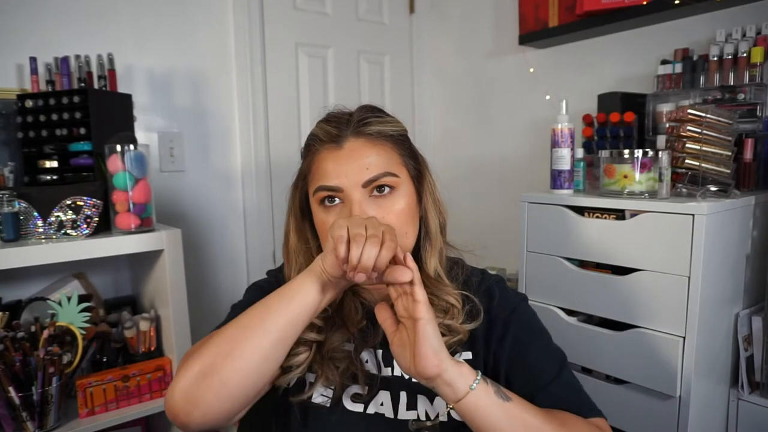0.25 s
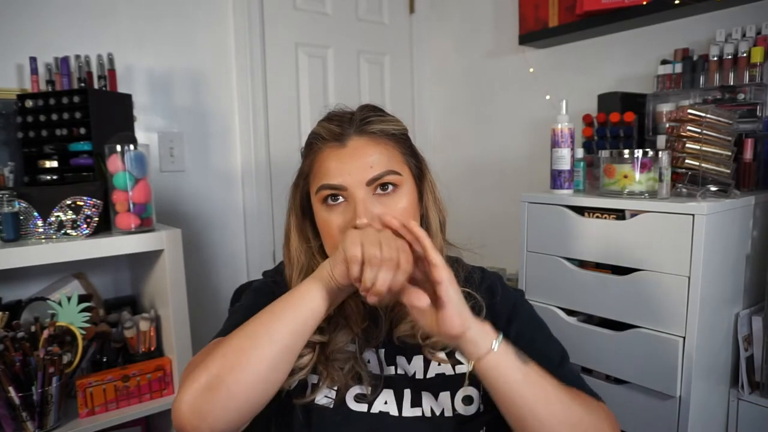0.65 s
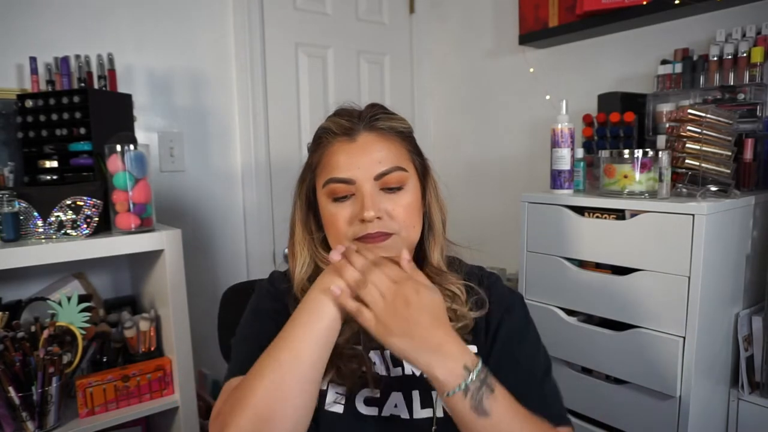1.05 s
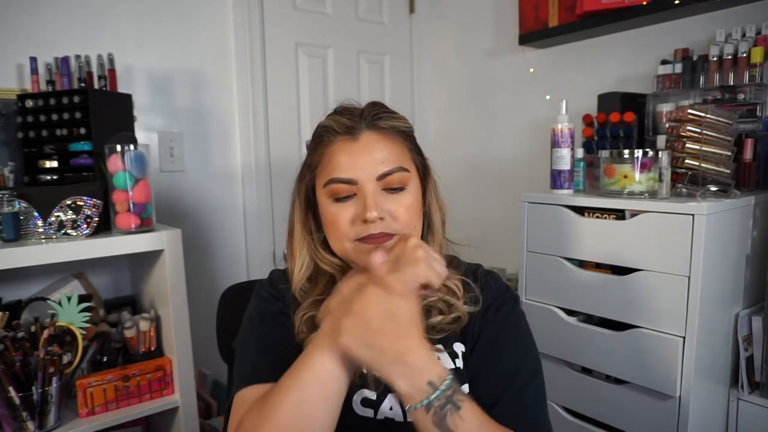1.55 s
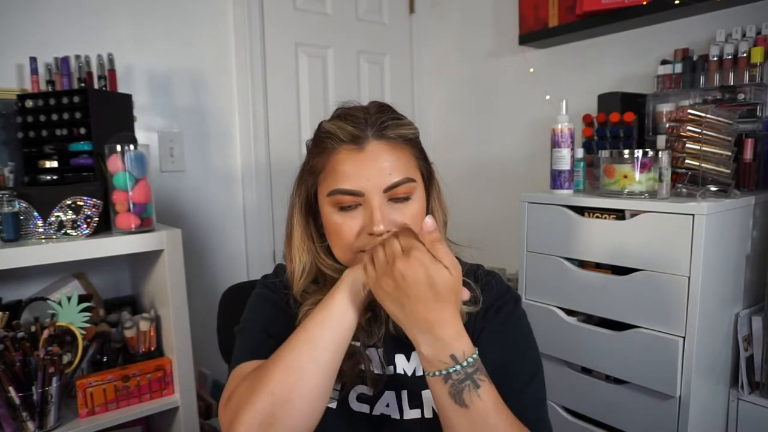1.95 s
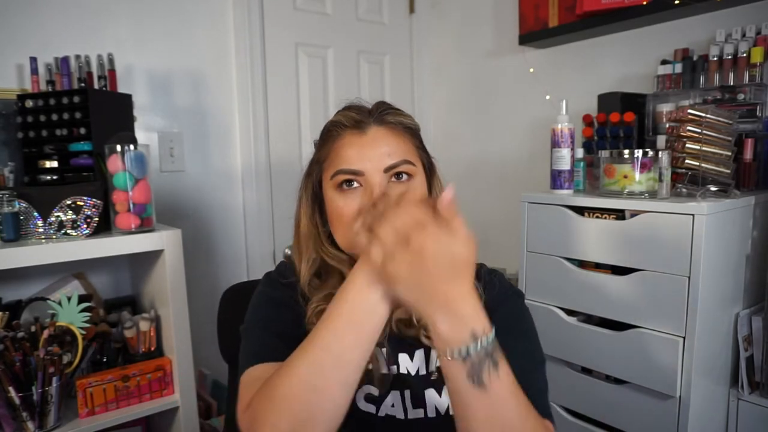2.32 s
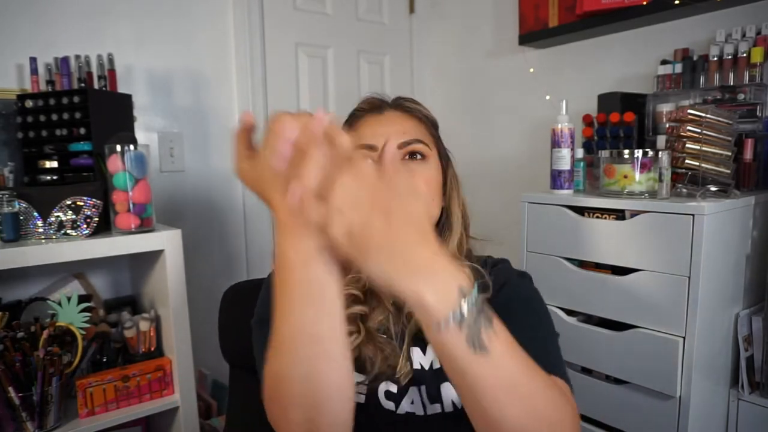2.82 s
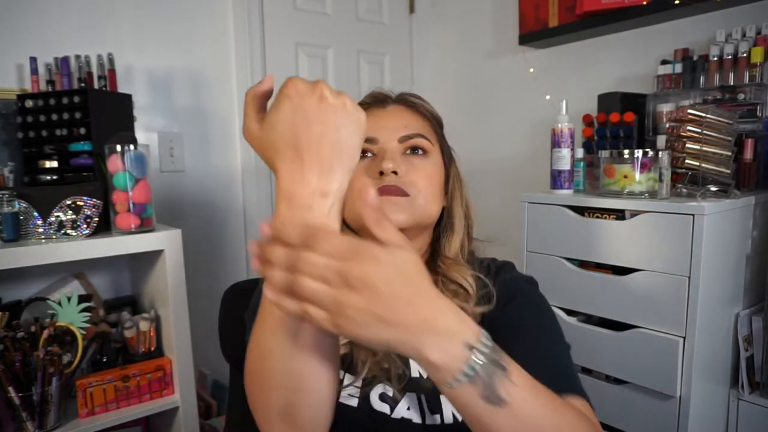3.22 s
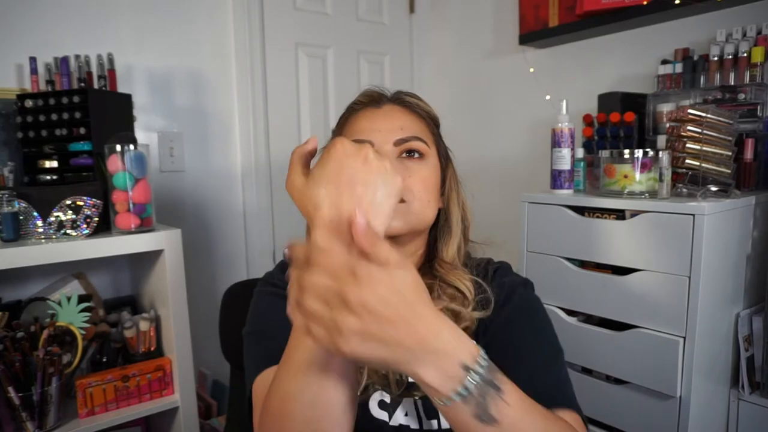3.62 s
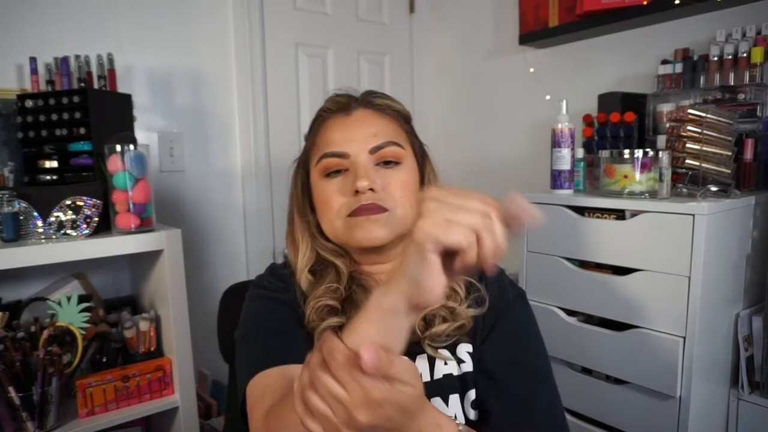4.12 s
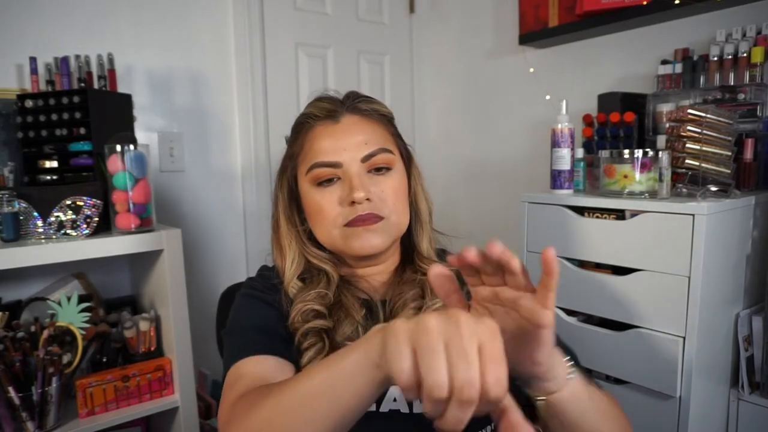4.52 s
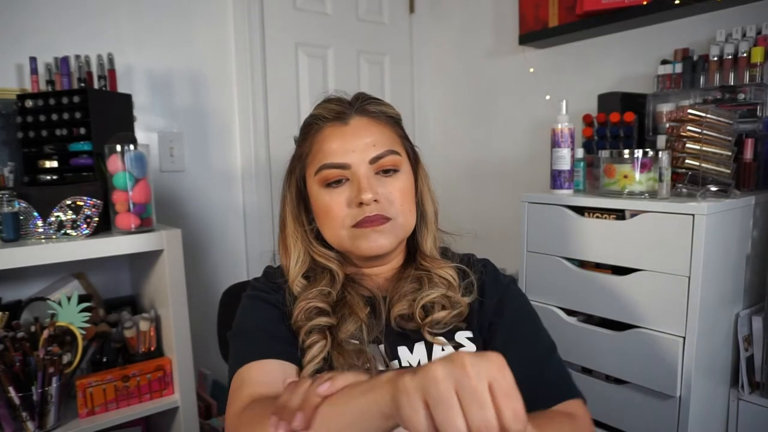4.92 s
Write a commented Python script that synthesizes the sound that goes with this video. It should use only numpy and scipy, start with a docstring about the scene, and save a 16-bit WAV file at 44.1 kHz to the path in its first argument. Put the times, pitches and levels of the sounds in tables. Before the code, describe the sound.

Soft hissing strokes of skin sliding on oiled skin grow brisker, with one small wet tick, over a low appliance hum.

```python
"""Oiled hands rub over each other and along a forearm in soft swishes, close before a stereo pair.
Countless tiny slips of skin make the hiss; a flat palm deepens it, and pockets of air between the
hands ring faintly. A wet tick sounds as a hand lands on the arm, and sleeves rustle. The place is a
small room: the desk reflects the strokes, and an electric appliance hums behind in the room tone."""
import sys
import numpy as np
from scipy import signal
from scipy.fft import rfft, irfft
from scipy.io import wavfile

SR = 44100
rng = np.random.default_rng(int(sys.argv[2]) if len(sys.argv) > 2 else 0)


def wav_record(signal):
    """Record a signal, one row per channel, as 16-bit PCM in the file named by sys.argv[1]."""
    frames = np.transpose(np.atleast_2d(signal))
    bounded = np.clip(frames, -1, 1)
    # unit amplitude maps onto the largest positive 16-bit level
    quanta = np.round(bounded * 32767).astype(np.int16)
    wavfile.write(sys.argv[1], SR, quanta)


N = 227586
TIME = np.arange(N) / SR
BANDS_HZ = 25 * 2 ** (np.arange(29) / 3)


def from_db(db):
    """Decibels to gain."""
    return 10 ** (np.asarray(db) / 20)


def unit_rms(x):
    """Scale to unit power."""
    return x / np.sqrt(np.mean(x ** 2) + 1e-20)


def in_time(points):
    """Read a curve sample by sample."""
    return np.interp(TIME, *np.transpose(points))


def at_hz(points, hz):
    """Read a spectrum on a log-frequency axis."""
    frequencies, values = np.transpose(points)
    return np.interp(np.log(hz), np.log(frequencies), values)


def drift(rate_hz):
    """Slow random wander with a spread of about 1."""
    step, settle = 40, 2000
    pole = np.exp(-2 * np.pi * rate_hz * step / SR)
    white = rng.standard_normal(N // step + settle + 2)
    slow = signal.lfilter([1], [1, -2 * pole, pole * pole], white)[settle:]
    return np.interp(np.arange(N) / step, np.arange(len(slow)), unit_rms(slow))


def filtered(x, hz, kind, order=2):
    """Low-, high- or band-pass."""
    return signal.sosfilt(signal.butter(order, hz, kind, fs=SR, output="sos"), x)


def third_octave(x, hz):
    """One band around hz."""
    return filtered(x, [hz / 2 ** (1 / 6), hz * 2 ** (1 / 6)], "band")


# Slides of skin over skin: (time [s], length [s], relative level [dB], fastest moment [share of length],
# peakedness [1 even push, 4 brief flick], palm contact [dB], its growth [dB], low edge of the hiss [Hz])
HAND_STROKES = [(-0.098, 0.47, -46.5, 0.2, 2.56, -5.4, -18, 5780),
                (0.5, 0.44, -52, 0.58, 1.5, -8, -1.1, 5340), (0.684, 0.38, -43.5, 0.41, 2.9, -4, -12, 3520),
                (0.899, 0.46, -52, 0.088, 2.1, -1.5, -4, 2900),
                (1.05, 0.53, -45.5, 0.68, 2.55, -4, 8, 2870), (1.059, 0.18, -49, 0.79, 2.6, 0.5, -5, 5400),
                (1.253, 0.084, -47.5, 0.4, 1.5, -4, 5, 4000), (1.507, 0.29, -39.5, 0.41, 1.84, -2, 4, 2200),
                (1.715, 0.34, -45, 0.76, 2.5, -8, 10, 3800), (2.01, 0.29, -40.5, 0.51, 2.06, -2, -5, 4760),
                (2.246, 0.098, -37.5, 0.99, 3, -9.5, -3, 4260),
                (2.28, 0.19, -40.5, 0.5, 1.6, -3.5, -11, 2550),
                (2.346, 0.35, -38, 0.68, 2.45, -5.6, -8, 2340),
                (2.57, 0.21, -31.5, 0.73, 2.35, -13.5, 11, 2800),
                (2.746, 0.093, -35, 0.18, 4.7, 0, 16, 4540),
                (2.795, 0.24, -33, 0.53, 1.73, -10.5, -2.2, 2890),
                (2.988, 0.24, -33.5, 0.31, 3.7, -6, 24, 2500), (3.09, 0.33, -34.5, 0.52, 2.8, -6, -7, 2120),
                (3.309, 0.23, -33.5, 0.64, 2, -9.5, 19, 2430),
                (3.489, 0.29, -36, 0.44, 1.7, -5.5, 2.0, 2100),
                (3.727, 0.17, -36, 0.51, 1.74, -7, 16, 2420),
                (3.882, 0.14, -37.5, 0.68, 0.79, -3, -2, 2720), (3.94, 0.2, -31, 0.51, 2.55, -2, 6, 3900),
                (4.115, 0.32, -38, 0.52, 2.16, -3, 1, 3550), (4.298, 0.28, -49, 0.25, 2.7, -0.5, 11, 3140),
                (4.652, 0.34, -38.5, 0.48, 3.45, 0.3, 21, 3780), (4.869, 0.57, -41, 0.22, 2, 0.7, -7, 3440)]

def strokes(slow_dull_db=1):
    """Each stroke speeds up and slows, duller when slow; where two overlap, the louder sets the colour."""
    total, colour = 0, 0
    for start, length, level_db, fastest, peakedness, palm_db, growth_db, edge_hz in HAND_STROKES:
        progress = np.clip((TIME - start) / length, 0, 1)
        speed = np.sin(np.pi * np.interp(progress, [0, np.clip(fastest, .05, .95), 1], [0, .5, 1]))
        power = (from_db(level_db) * speed ** peakedness) ** 2 + 1e-14
        contact_db = palm_db + growth_db * (progress - .5) + slow_dull_db * (1 - speed)
        total += power
        colour += power * np.array([contact_db, np.full(N, edge_hz)])
    contact_db, edge_hz = colour / total
    return 10 * np.log10(total), contact_db, edge_hz


def skin_slips(per_s=8000, spread_db=2.5, smooth_hiss=0.9):
    """Tiny releases of oily skin, uneven in size, over a smooth sliding hiss."""
    sizes = from_db(spread_db * np.minimum(rng.exponential(1, N), 4)) * rng.choice([-1, 1], N)
    releases = sizes * (rng.random(N) < per_s / SR)
    return unit_rms(unit_rms(releases) + smooth_hiss * rng.standard_normal(N))


# Sliding skin, heard close: (frequency [Hz], relative density [dB])
SKIN_SPECTRUM = [(500, -15), (1000, -9.5), (1600, -9), (2200, -5.5), (3000, -2), (4500, -0.56),
                 (6500, -0.43), (9000, -0.5), (12500, 1.5), (15500, 0.5)]
# How far each band follows the palm contact: (frequency [Hz], share [0-1])
PALM_WEIGHT = [(500, 0), (2000, 0.88), (4000, 1.0), (6000, 0.84), (8500, 0), (12000, 0)]
# A hard rub bites more: (frequency [Hz], boost [dB per dB of stroke level])
RUB_BITE = [(4000, 0.116), (7500, 0.22), (10000, 0.09), (14000, 0)]

def rubbing(trim_db=1, judder_db=0.43, patchy_db=1.72, usual_swish_db=-40, late_share=0.18, room_db=0.5):
    """Sliding speed sets the level, contact area the depth, the gap between the hands the low edge."""
    swish_db, palm_db, edge_hz = strokes()
    slips = [skin_slips(), skin_slips()]
    scatter = rng.standard_normal((3, 2, N))
    level_db = trim_db + swish_db + judder_db * drift(19)
    direct, diffuse, treble_power = 0, 0, 0
    for k, hz in enumerate(BANDS_HZ[BANDS_HZ > 450]):
        skin = from_db(at_hz(SKIN_SPECTRUM, hz))
        band = skin * third_octave(slips[k % 2], hz)
        treble_power += np.mean(band ** 2) * (hz > 7000)
        thin_db = 8.5 * np.maximum(np.log2(edge_hz / hz), 0)   # by octaves below the edge
        depth_db = at_hz(PALM_WEIGHT, hz) * palm_db
        bite_db = at_hz(RUB_BITE, hz) * (swish_db - usual_swish_db)
        gain = from_db(level_db + depth_db + bite_db - thin_db + patchy_db * drift(18.7))
        direct += gain * band
        # the hands keep moving, so their reflections blur into a wash that differs at each microphone
        wash = np.sqrt((1 - late_share) * gain ** 2 + late_share * room_decay(gain ** 2))
        diffuse += wash * skin * third_octave(scatter[k % 3], hz)
    return direct / np.sqrt(treble_power), from_db(room_db) * diffuse / np.sqrt(treble_power)


def room_decay(power, t60_s=0.42):
    """Power lingers between the walls of the small room, dying away."""
    pole = from_db(-120 / (t60_s * SR))
    return signal.lfilter([1 - pole], [1, -pole], power + 1e-18)


def microphone_pair(direct, right_lag_samples=0.52, desk_db=-10, desk_decay_s=0.0037):
    """The hands are a hair nearer the left microphone; quick reflections come off the desk."""
    hz = np.arange(N // 2 + 1) * SR / N
    right = irfft(rfft(direct) * np.exp(-2j * np.pi * hz * right_lag_samples / SR), N)
    age = np.arange(SR // 50) / SR
    desk = rng.standard_normal((2, len(age))) * np.exp(-age / desk_decay_s)
    desk *= from_db(desk_db) / np.linalg.norm(desk, axis=1, keepdims=True)
    return np.array([direct, right]) + signal.fftconvolve(direct[None], desk, axes=1)[:, :N]


# Sleeves shifting, at the microphones: (time [s], level [dB])
SLEEVE_LEVELS = [(0, -74), (2.2, -73), (2.75, -66.5), (3.4, -63), (3.75, -76), (4.05, -67), (5.16, -70)]

def sleeves(band_hz=(300, 650)):
    """Cloth rustles dully as the arms move."""
    cloth = filtered(rng.standard_normal((2, N)), band_hz, "band")
    return from_db(in_time(SLEEVE_LEVELS)) * unit_rms(cloth)


# The appliance, farther back: (frequency [Hz], steady level [dB rms], unsteadiness [0-1])
HUM_TONES = [(110.9, -76, 0.26), (120.45, -68, 0.08), (178.4, -68.5, 0.04), (220.9, -55.5, 0.03),
             (252, -81, 0.8), (253.4, -82.5, 0.84), (295.9, -73.5, 0.48), (960, -77.5, 0.27)]

def appliance_hum():
    """Motor and mains tones waver, alike in both microphones."""
    hum = 0
    for hz, level_db, unsteadiness in HUM_TONES:
        waver = 1 + unsteadiness * (drift(6.8) + 1j * drift(9.5))
        tone = np.exp(2j * np.pi * (hz * TIME + rng.random()))
        hum += from_db(level_db) * np.sqrt(2) * np.real(waver * tone)
    return hum


# The quiet of the room: (frequency [Hz], relative density [dB])
ROOM_SPECTRUM = [(30, -9.5), (50, -9), (80, -3.5), (115, -2), (150, 6.5), (250, 8), (350, 3), (480, 2.8),
                 (600, 3.5), (750, -0.3), (1050, 3), (1600, -1.5), (4000, -7.5), (9000, -8), (15000, -7.5)]
# Its likeness across the pair: (frequency [Hz], correlation [-1 to 1])
ROOM_CORRELATION = [(40, 0.12), (120, 1), (280, 0.44), (450, 0.48), (700, -0.19), (3000, -0.25),
                    (15000, -0.45)]

def room_tone(level_db=-56.5):
    """Steady room air and microphone hiss, alike on both sides only in the bass."""
    air, white = 0, rng.standard_normal((2, 2, N))
    for k, hz in enumerate(BANDS_HZ):
        mid, side = third_octave(white[k % 2], hz)
        alike = at_hz(ROOM_CORRELATION, hz)
        band = np.sqrt(1 + alike) * mid + np.sqrt(1 - alike) * side * [[1], [-1]]
        air += from_db(at_hz(ROOM_SPECTRUM, hz)) * band
    return from_db(level_db) * unit_rms(air)


# Hollows between the hands: (time [s], length [s], first pitch [Hz], last pitch [Hz], relative level [dB])
AIR_POCKETS = [(2.319, 0.083, 3800, 2940, -54), (2.487, 0.094, 3510, 3340, -52.5),
               (3.425, 0.13, 2860, 2197, -54.5), (3.891, 0.084, 4690, 2960, -52),
               (3.945, 0.066, 2880, 4460, -47.5), (4.035, 0.069, 2980, 2760, -50),
               (4.752, 0.1, 3850, 4540, -50), (4.929, 0.13, 3360, 4700, -52.5)]

def air_pockets(half_width_hz=260, trim_db=1):
    """Cupped air rings in a narrow band that swells, glides as the hollow changes size, and fades."""
    white = rng.standard_normal((3, N)) + 1j * rng.standard_normal((3, N))
    narrow = filtered(white, half_width_hz, "low")
    glides = 0
    for start, length, first_hz, last_hz, level_db in AIR_POCKETS:
        progress = np.clip((TIME - start) / length, 0, 1)
        hz = first_hz * (last_hz / first_hz) ** progress
        swell = from_db(level_db) * np.sin(np.pi * progress)
        glides += swell * np.exp(2j * np.pi * np.cumsum(hz) / SR)
    ring = np.real(narrow * glides) / np.std(narrow.real)
    return from_db(trim_db) * (ring[0] + ring[1:])   # one shared part, plus one for each microphone


# A hand landing on the oiled arm: (time [s], level [dB])
LANDINGS = [(4.6725, -32)]

def wet_tick(decay_s=0.0019, low_hz=2300, echo_db=1):
    """The oil film breaks in a sharp snap, and the room answers briefly."""
    breaks = np.zeros(N)
    for start, level_db in LANDINGS:
        breaks[round(start * SR)] = from_db(level_db)
    envelope = signal.lfilter([1], [1, -np.exp(-1 / (decay_s * SR))], breaks + 1e-18)
    echo = from_db(echo_db) * np.sqrt(room_decay(envelope ** 2)) * rng.standard_normal((2, N))
    snap = envelope * rng.standard_normal(N)
    return filtered(snap + echo, low_hz, "high", order=1)


# Where the hands are before the pair: (time [s], left minus right [dB])
HAND_BALANCE = [(0, -0.7), (2.0, -1.3), (2.75, 0.5), (3.3, 0), (5.16, -0.8)]

def scene(hands_db=-3.5):
    """The hands stay almost straight ahead of the microphones, swaying a little from side to side."""
    direct, diffuse = rubbing()
    pan_db = in_time(HAND_BALANCE) * np.array([[.5], [-.5]])
    hands = from_db(hands_db + pan_db) * (microphone_pair(direct) + diffuse + air_pockets())
    return hands + wet_tick() + sleeves() + appliance_hum() + room_tone()


def record(dry, cutoff_hz=15900):
    """A steep high cut on both channels."""
    return signal.sosfilt(signal.ellip(12, .1, 80, cutoff_hz, fs=SR, output="sos"), dry)


dry = scene()
out = record(dry)
wav_record(out)
```